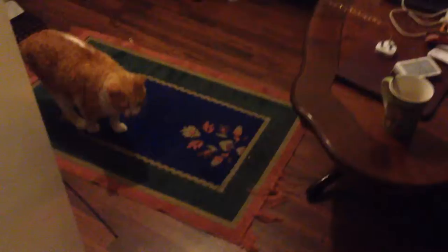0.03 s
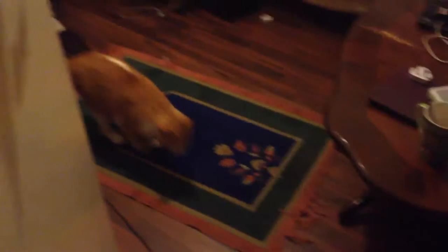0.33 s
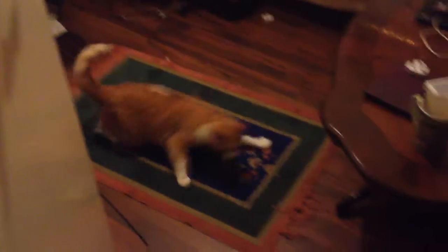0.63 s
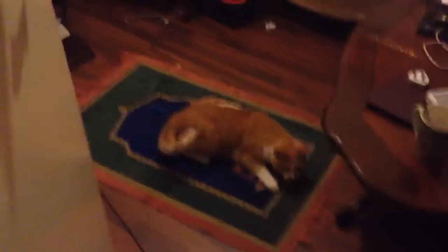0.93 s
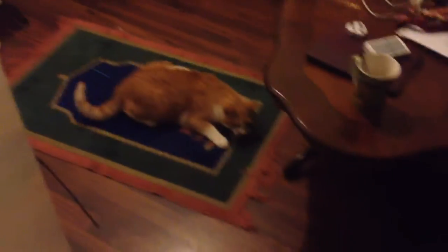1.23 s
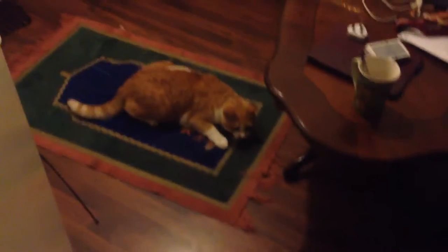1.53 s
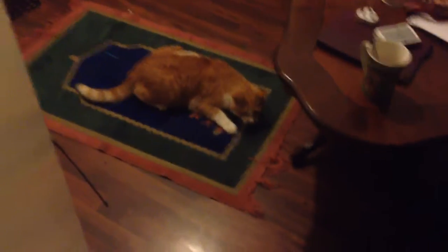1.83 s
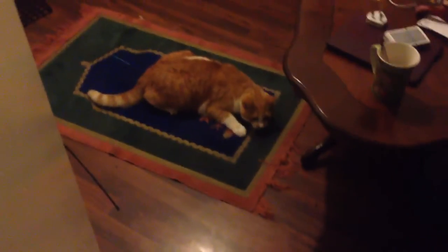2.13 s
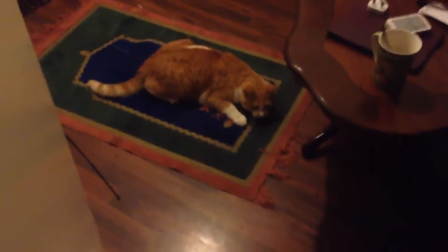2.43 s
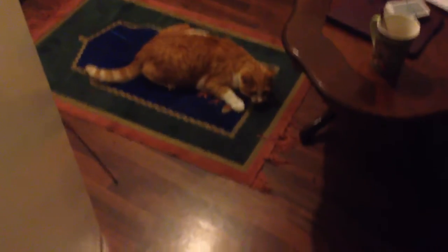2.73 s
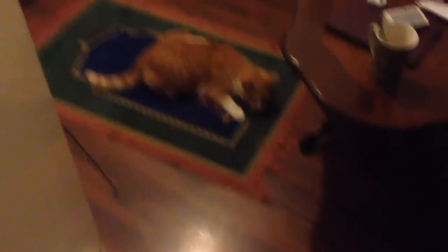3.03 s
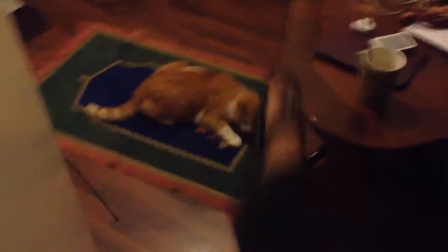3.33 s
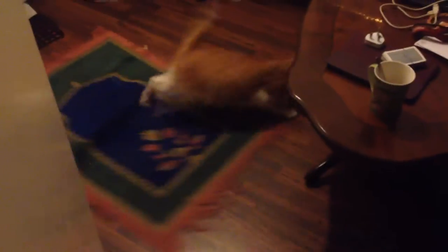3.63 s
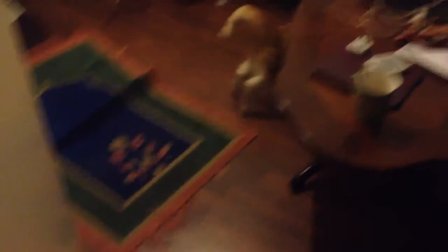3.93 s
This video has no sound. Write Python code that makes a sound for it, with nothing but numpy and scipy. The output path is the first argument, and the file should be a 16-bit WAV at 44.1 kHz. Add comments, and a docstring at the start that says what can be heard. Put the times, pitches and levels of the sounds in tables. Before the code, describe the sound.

A hand rubs fabric to and fro close to the microphone, about four rasping strokes a second, in a quiet room. A cat thumps softly on a rug, then bolts with thumps, ticks and swishes as the rubbing stops.

```python
"""A hand rubs to and fro over fabric near the microphone, about four strokes a second, teasing a cat.
Fibres rasp with the pressure and hiss with the speed of each stroke; the last flicks away with a zip.
Across a quiet living room the cat pounces on a rug and later bolts: soft thumps set the wooden floor
ringing, with scuffs, ticks and swishes. One microphone hears it all, with a short room tail."""
import sys
import numpy as np
from scipy import signal
from scipy.fft import rfft, irfft
from scipy.io import wavfile
from scipy.ndimage import uniform_filter1d, map_coordinates

SR = 44100
rng = np.random.default_rng(int(sys.argv[2]) if len(sys.argv) > 2 else 0)


def materialize(psi):
    """Save the field psi as 16-bit PCM at rate SR to the path in sys.argv[1].

    A 1-D psi becomes a single channel; in a 2-D psi each row is a channel.
    """
    bounded = np.clip(np.atleast_2d(psi).T, -1, 1)
    quanta = np.round(bounded * 32767).astype(np.int16)
    wavfile.write(sys.argv[1], SR, quanta)


N = 176400
T = np.arange(N) / SR

# Strokes of the hand, close up. Each row: start and end in seconds, rasp and hiss levels in dB,
# then the points of top speed and of hardest pressure as shares of the stroke.
STROKES = [(-.04, 0.133, -49, -54, 0.56, 0.54), (0.131, 0.433, -45, -46, 0.67, 0.38),
           (0.42, 0.728, -45, -46.5, 0.58, 0.42), (0.716, 0.973, -43.5, -47, 0.5, 0.49),
           (0.97, 1.212, -43, -47, 0.6, 0.58), (1.21, 1.451, -41, -45, 0.67, 0.74),
           (1.454, 1.722, -42, -45, 0.44, 0.58), (1.718, 1.976, -38.5, -48, 0.54, 0.63),
           (1.977, 2.243, -40.5, -46.5, 0.3, 0.6), (2.227, 2.481, -41, -45.5, 0.38, 0.69),
           (2.484, 2.737, -42.5, -46, 0.31, 0.44), (2.715, 3.009, -43.5, -45, 0.5, 0.61),
           (3.018, 3.188, -42, -39.5, 0.76, 0.5)]
# Spectra of the fabric's rasp and hiss. Each row: frequency in Hz, level in dB.
RASP_SPECTRUM = [(120, -25), (200, -8.5), (350, -11.5), (600, -12.5), (1000, -9), (1350, -6.5),
                 (1700, -1.5), (2300, 1), (2750, -1), (3300, -6.5), (4500, -10.5), (7000, -11.5),
                 (15000, -23)]
HISS_SPECTRUM = [(300, -29), (1500, -7.5), (3000, 2.5), (4200, 3), (5700, -6), (7500, -1.5), (9500, -6.5),
                 (12500, -5.5), (15500, -9.5)]
# The hand digs in harder. Each row: peak time and width in seconds, level in dB, centre in Hz.
DIGS = [(1.066, 0.0093, -42.5, 3760), (1.815, 0.024, -37.5, 2330), (2.32, 0.0088, -39.5, 2240),
        (2.675, 0.014, -44, 4440), (2.86, 0.016, -43.5, 6040), (3.142, 0.031, -39, 6600)]


def rubbing():
    """The hand speeds up and turns; pressure drives the rasp, speed the hiss, and the grip is uneven."""
    turn_share, flatten = .24, 1.66  # drive left at a turn; how flat the pressure stays in mid-stroke
    rows = np.array(STROKES)
    starts, lift_off = rows[:, 0], rows[-1, 1]
    pressure = sum(arch(start, end, top) for start, end, _, _, _, top in rows)
    pressure = np.tanh(flatten * pressure) / np.tanh(flatten)
    speed = sum(arch(start, end, top) for start, end, _, _, top, _ in rows)
    stroke = np.searchsorted(starts, T) - 1
    rasp_db, hiss_db = uniform_filter1d(rows[stroke, 2:4].T, size=1500)
    rasp = fibres(RASP_SPECTRUM) * undb(rasp_db) * ((pressure + turn_share) / (1 + turn_share)) ** 2.07
    hiss = fibres(HISS_SPECTRUM) * undb(hiss_db) * ((speed + turn_share) / (1 + turn_share)) ** 1.92
    digs = sum(undb(db) * bell(at, width) * noise_band(hz, .42 * hz) for at, width, db, hz in DIGS)
    grip_db = .75 * wander(per_second=30)
    touching = uniform_filter1d(1. * (T < lift_off), size=800)
    direct = touching * ((rasp + digs) * undb(grip_db) + hiss * undb(grip_db / 2))
    # A reflection off the surface beside the hand arrives sooner or later as the hand travels.
    position = np.cos(np.pi * np.interp(T, np.append(starts, lift_off), np.arange(len(rows) + 1)))
    lag_s = (.911 + .33 * position) / 1000
    return direct + .13 * map_coordinates(direct, [(T - lag_s) * SR], order=3)


def fibres(spectrum, snaps_per_s=26000, flicker_db=2.14):
    """Dense snaps of single fibres; narrow bands flicker as the contact patch changes."""
    snaps = np.sqrt(rng.poisson(snaps_per_s / SR, N)) * noise() * np.exp(.14 * noise())
    _, _, bands = signal.stft(colour(snaps, spectrum), nperseg=512)
    patch = uniform_filter1d(rng.standard_normal(bands.shape), size=3, axis=0)
    patch = uniform_filter1d(patch, size=6, axis=1)  # about 28 changes a second
    return unit(signal.istft(bands * undb(flicker_db * unit(patch)))[1][:N])


# The weave sings under the hand.
# Each row: start and length in seconds, first and last pitch in Hz, level in dB.
ZIPS = [(.435, 0.094, 2350, 2600, -45.5), (1.048, 0.04, 3100, 3090, -41.5), (1.1, 0.093, 1620, 1752, -46.5),
        (1.75, 0.067, 1100, 1220, -47.5), (3.085, .085, 1600, 2750, -43.5),
        (3.112, 0.0595, 991, 1450, -45.5), (3.135, 0.049, 2700, 2450, -42.5),
        (3.15, 0.044, 1380, 1480, -58)]


def zips(width_hz=170):
    """Threads crossed at a near-even rate make a narrow, gliding band."""
    out = np.zeros(N)
    for start, length, first_hz, last_hz, db in ZIPS:
        pitch = np.interp(T, [start, start + length], [first_hz, last_hz])
        phase = 2 * np.pi * np.cumsum(pitch) / SR
        tone = wander(width_hz) * np.cos(phase) + wander(width_hz) * np.sin(phase)
        out += undb(db) * arch(start, start + length, .43) * tone
    return out


# The cat lands on the floor. Each row: start in seconds, level in dB, pitch in Hz.
THUMPS = [(0.498, -49, 159), (.63, -50, 228), (.752, -41.5, 470), (.764, -42, 440), (1.312, -47.5, 183),
          (1.844, -53, 202), (1.919, -42, 265), (2.302, -29.5, 205), (2.858, -61, 197), (3.027, -44.5, 480),
          (3.605, -38.5, 334), (3.613, -38, 175), (3.644, -30, 450), (3.649, -34.5, 193),
          (3.661, -33.5, 397), (3.677, -35, 202), (3.733, -40, 171), (3.763, -37, 427), (3.933, -34.5, 467),
          (3.940, -33, 390), (3.97, -41, 175)]
# Resonances of the floorboards. Each row: frequency in Hz, relative gain in dB.
FLOOR_MODES = [(115, -13), (167, -4), (186, -16), (226, -4), (278, -11.5), (372, -22), (428, -13.5),
               (490, -6), (555, -21)]
# Spectrum of a knock on the wood. Each row: frequency in Hz, level in dB.
KNOCK_SPECTRUM = [(200, -25), (500, 9.5), (1400, -3.5), (2000, -19), (3200, -11.5), (6000, -25),
                  (15000, -65)]


def thumps(rise_cycles=.84, ring_t60_cycles=30):
    """Padded blows of a few cycles set the boards ringing; harder, higher ones also knock."""
    blows, knock_level = np.zeros(N), np.zeros(N)
    highest_hz = max(hz for _, _, hz in THUMPS)
    for start, db, hz in THUMPS:
        cycles = T[:SR // 4] * hz
        age = cycles / rise_cycles
        blow = -undb(db) * (age * np.exp(1 - age)) ** 2 * np.sin(2 * np.pi * cycles)
        i = int(start * SR)
        blows[i:i + len(blow)] += blow[:N - i]
        knock_level += undb(db) * (hz / highest_hz) ** 2 * fade(start, decay_s=.014)
    width_share = np.log(1000) / np.pi / ring_t60_cycles
    ring = sum(undb(db) * resonate(blows, hz, width_share * hz) for hz, db in FLOOR_MODES)
    knock = knock_level * colour(noise(), KNOCK_SPECTRUM)
    return blows + undb(6) * ring + undb(-10.5) * knock


# Weight shifts over the boards. Each row: peak time and width in seconds, level in dB.
SHUFFLES = [(.53, 0.02, -63), (0.634, 0.026, -53), (.83, .065, -52), (3.13, 0.042, -59),
            (3.66, 0.037, -45.5), (3.785, 0.027, -49.5)]
# Spectrum of that dull shuffle. Each row: frequency in Hz, level in dB.
SHUFFLE_SPECTRUM = [(30, -24), (60, -6), (100, -3), (165, 0), (230, 1), (320, -4), (450, -4.5), (650, -22),
                    (1200, -25), (3000, -38)]


def shuffles():
    """Soft, blurred rumble of a body sliding and padding on the rug."""
    power = sum((undb(db) * bell(at, width)) ** 2 for at, width, db in SHUFFLES)
    return np.sqrt(power) * colour(noise(), SHUFFLE_SPECTRUM)


# Paws scuff the rug. Each row: start in seconds, level in dB, centre in Hz, decay in seconds.
SCUFFS = [(3.643, -42, 1300, 0.041), (3.644, -46, 3050, 0.053)]


def scuffs():
    """A short, hollow rasp as the paws push off."""
    return sum(undb(db) * fade(start, decay) * noise_band(hz, width_hz=450)
               for start, db, hz, decay in SCUFFS)


# Sharp ticks as the cat bolts. Each row: start in seconds, level in dB, centre in Hz, decay in seconds.
TICKS = [(3.22, -42.5, 13000, 0.022), (3.22, -42.5, 5000, 0.0064), (3.272, -41, 7000, 0.0017),
         (3.276, -46.5, 3650, 0.028), (3.331, -47, 4440, 0.0057), (3.501, -39.5, 4700, 0.0032),
         (3.72, -31, 8040, 0.0014), (3.723, -41.5, 4640, 0.014)]


def ticks():
    """Brief bright ticks, like claws catching."""
    return sum(undb(db) * fade(start, decay) * noise_band(hz, .7 * hz) for start, db, hz, decay in TICKS)


# Slides of cloth and rug. Each row: peak time, rise and fall in seconds, level in dB, dullness 0 to 1.
SWISHES = [(3.23, 0.0074, 0.05, -57, 0), (3.3, .02, 0.086, -57, 0.3), (3.515, 0.01, .09, -52.5, 0.02),
           (3.58, 0.037, .07, -51.5, .9), (3.67, 0.065, 0.1, -50, 0.3), (3.819, 0.014, 0.032, -41.5, 0),
           (3.97, 0.019, 0.073, -54, 1)]
# Spectrum of a bright swish. Each row: frequency in Hz, level in dB.
SWISH_SPECTRUM = [(200, -25), (1000, -6), (2000, -3.5), (3200, -2), (4500, -1), (5700, -5.5), (7300, -2),
                  (10000, -9.5), (15000, -14)]


def swishes():
    """Cloth and rug slide as the cat bolts; some swishes are bright, others dull."""
    out = np.zeros(N)
    for at, rise, fall, db, dullness in SWISHES:
        bright = fibres(SWISH_SPECTRUM)
        dull = unit(lowpass(fibres(SWISH_SPECTRUM), hz=2760, order=2))
        swell = np.where(T < at, bell(at, rise), fade(at, fall))
        out += undb(db) * swell * (np.sqrt(1 - dullness) * bright + np.sqrt(dullness) * dull)
    return out


def room(direct, t60_s=.32, tail_db=-12.5):
    """The furnished room sends a short, soft tail back to the microphone."""
    tail = lowpass(noise(), hz=6100, order=1) * fade(.005, t60_s / np.log(1000))
    tail /= np.sqrt(np.sum(tail ** 2))
    return direct + undb(tail_db) * signal.fftconvolve(direct, tail)[:N]


# Room tone at the microphone. Each row: frequency in Hz, level in dB.
AIR_SPECTRUM = [(25, -26), (60, -26), (100, -10), (160, -0.5), (250, -0.5), (370, -3.5), (490, -1.5),
                (650, -4), (1200, -9.5), (4000, -12.5), (8000, -17), (15000, -24)]


def room_air():
    """The faint, steady hush of the living room."""
    return undb(-57.5) * colour(noise(), AIR_SPECTRUM)


def undb(db):
    """Decibels to gain."""
    return 10 ** (np.asarray(db) / 20)


def unit(x):
    """Scale to rms 1."""
    return x / np.sqrt(np.mean(x ** 2) + 1e-20)


def colour(x, spectrum):
    """Shape a sound by a spectrum of (Hz, dB) points, at rms 1."""
    hz, db = np.array(spectrum).T
    bins_hz = np.maximum(np.fft.rfftfreq(N, 1 / SR), 1)
    gain = undb(np.interp(np.log(bins_hz), np.log(hz), db))
    return unit(irfft(rfft(x) * gain, N))


def noise():
    """White noise."""
    return rng.standard_normal(N)


def noise_band(hz, width_hz):
    """Noise through one resonance, at rms 1."""
    return unit(resonate(noise(), hz, width_hz))


def wander(per_second):
    """Smooth random drift at rms 1."""
    span = int(SR / per_second)
    return unit(uniform_filter1d(uniform_filter1d(noise(), span), span))


def resonate(x, hz, width_hz):
    """A single resonance."""
    return signal.lfilter(*signal.iirpeak(hz, hz / width_hz, fs=SR), x)


def lowpass(x, hz, order):
    """Dull the treble above hz."""
    return signal.lfilter(*signal.butter(order, hz, fs=SR), x)


def fade(start, decay_s):
    """Sudden onset and exponential decay."""
    return (T >= start) * np.exp(-np.maximum(T - start, 0) / decay_s)


def bell(at, width_s):
    """A Gaussian swell that peaks at 1."""
    return np.exp(-((T - at) / width_s) ** 2 / 2)


def arch(start, end, top):
    """Rises from 0 to 1 at the share top of its length, and returns."""
    return np.sin(np.pi * np.interp(T, [start, start + top * (end - start), end], [0, .5, 1]))


def scene():
    """Hand and cat over the quiet room air, the same in both channels."""
    sources = rubbing() + zips() + thumps() + shuffles() + scuffs() + ticks() + swishes()
    mono = room(sources) + room_air()
    return np.array([mono, mono])


def record(dry):
    """The microphone opens after a moment, thins the deep bass and cuts the top."""
    open_s, bass_hz, top_hz = .036, 100, 15450
    thin = signal.sosfilt(signal.butter(2, bass_hz, "high", fs=SR, output="sos"), dry * (T >= open_s))
    return signal.sosfilt(signal.ellip(10, .2, 70, top_hz, fs=SR, output="sos"), thin)


dry = scene()
out = record(dry)
materialize(out)
```